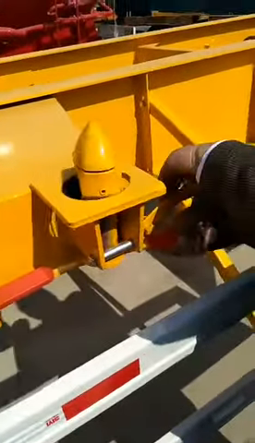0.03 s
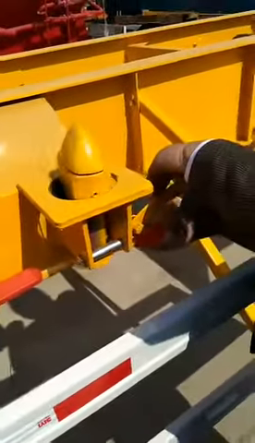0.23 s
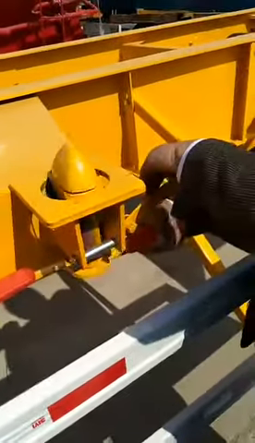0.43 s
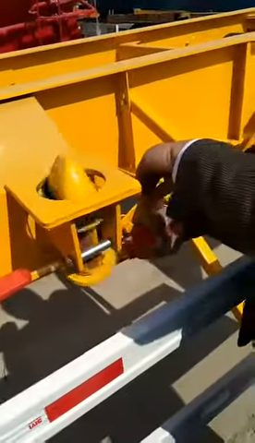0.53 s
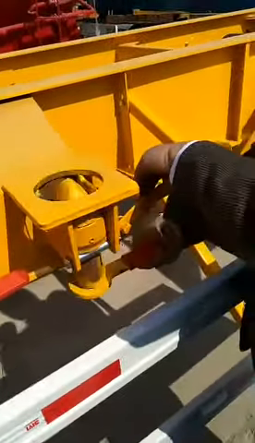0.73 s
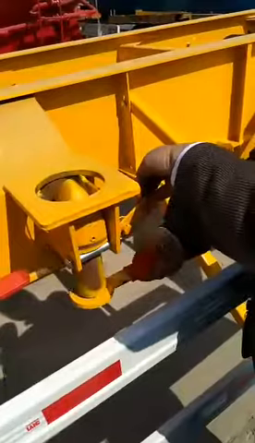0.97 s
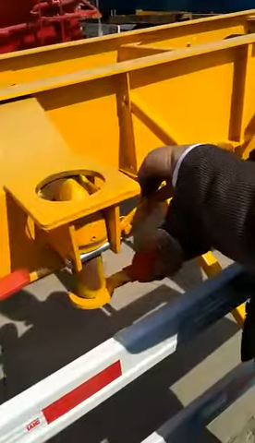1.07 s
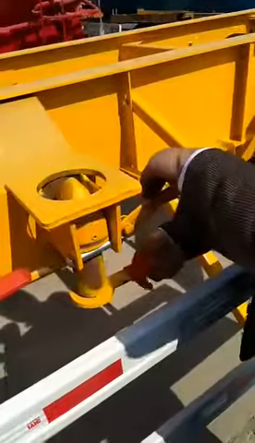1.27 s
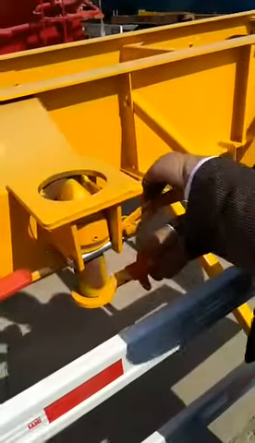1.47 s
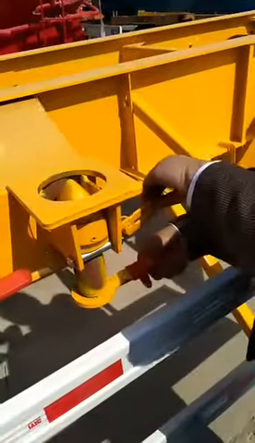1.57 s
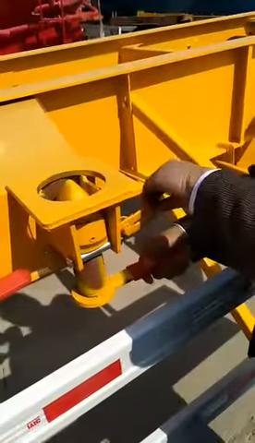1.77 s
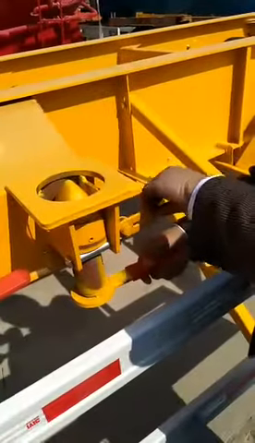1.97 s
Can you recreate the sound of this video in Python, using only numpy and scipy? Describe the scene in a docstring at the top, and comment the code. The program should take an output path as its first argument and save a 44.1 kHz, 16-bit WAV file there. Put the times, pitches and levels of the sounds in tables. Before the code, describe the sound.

Ringing metal clunks and a short scrape as a trailer's lock pin drops into place.

```python
"""Twist lock on a trailer

Outdoors in a yard, one microphone close to a steel twist lock worked by hand. The pin knocks,
scrapes down its sleeve, drops into the bracket and bounces; the handle is set down last. Each blow
runs through the steel frame, treble first and bass after, and leaves it ringing over a low rumble."""
import sys
import numpy as np
from scipy import signal
from scipy.fft import rfft, irfft
from scipy.io import wavfile
from scipy.ndimage import uniform_filter1d

SR = 44100
rng = np.random.default_rng(int(sys.argv[2]) if len(sys.argv) > 2 else 0)


def master(y):
    """Save y as 16-bit WAV."""
    cut = np.clip(np.atleast_2d(y).T, -1, 1)
    pcm = np.round(cut * 32767)  # scale
    wavfile.write(sys.argv[1], SR, pcm.astype(np.int16))


N = 88200

# rumble of the yard: frequency_hz, octave_level_db
YARD_COLOUR = [(20, -81), (40, -70), (70, -56), (110, -50), (200, -54), (350, -54), (600, -66), (1200, -67),
               (1600, -73), (2100, -91), (4000, -99), (8000, -98), (15000, -97)]
# handle rubbing as it turns: time_s, level_db
RUB_LEVELS = [(1.452, -69), (1.55, -57), (1.658, -60), (1.75, -56), (1.92, -56), (2.0, -65)]
# its friction noise: frequency_hz, octave_level_db
RUB_COLOUR = [(100, -8), (350, 1), (600, -4), (1000, 0), (1400, -7), (1900, -34), (4000, -55), (15000, -65)]
# pin scraping down the sleeve: time_s, grind_db, singing_db
SLIDE_LEVELS = [(0.331, -48, -87), (.365, -34.5, -72), (0.409, -30, -67.5), (.45, -41.5, -63.5),
                (.50, -34.5, -63.5), (.56, -40.5, -62), (.61, -42, -59)]
# its grinding: frequency_hz, octave_level_db
GRIND_COLOUR = [(50, -13.5), (120, 6), (220, -1.5), (380, 7), (700, -11), (1200, -21), (1900, -25.5),
                (2450, -24), (3000, -33), (3750, -36.5), (4500, -62), (9000, -57), (15000, -62)]
# grit in the sleeve: start_s, level_db
GRIT_TICKS = [(.449, -71), (.474, -64.5), (.498, -66.5), (.520, -71.5), (.598, -68)]
# one tick of grit: frequency_hz, octave_level_db
GRIT_COLOUR = [(2000, -13), (5500, -7.5), (9000, 3), (11000, -3.5), (13000, -22.5)]

# sleeve around the pin: pitch_hz, level_db, t60_s
SLEEVE_MODES = [(1160, -9, .06), (1170, -7, 0.084), (2310, -5.5, 0.1), (2357, -2.5, 0.11),
                (2440, -4, 0.095), (2740, -10, 0.078), (3220, -19.5, 0.11), (3830, -16, .1)]
# cone on top of the pin: pitch_hz, level_db, t60_s
CONE_MODES = [(952, -0.5, .16), (1030, 5.5, 0.064), (1020, -7, 0.48), (1100, -10, 0.35), (1377, -9.5, 0.28),
              (1540, -11.5, 0.32), (2395, -17, 0.1), (7670, -46, 0.22)]
# high ring of the pin: pitch_hz, level_db, t60_s
PIN_MODES = [(7660, -53, .15), (7750, -49, .15), (9340, -60, .08), (11750, -57, .08), (13000, -60, .16),
             (13260, -62, .16)]
# handle: pitch_hz, level_db, t60_s
HANDLE_MODES = [(700, -1, .15), (775, -9, .25), (1071, -11, .25), (1330, -13, .25), (1459, -7, .24),
                (1830, -13, .26), (2330, -20, .13), (3230, -18, .14), (3560, -24, .13), (4630, -35, .1),
                (4720, -36, .1), (6760, -48, .13), (6930, -45, .13)]
# bracket: pitch_hz, level_db, t60_s
BRACKET_MODES = [(1510, -16.5, 0.38), (1484, -32.5, 0.2), (1770, -27, 1), (2040, -29.5, .33),
                 (2170, -25, .25), (2733, -27, 0.49), (3120, -29, 0.24), (3180, -29, 0.28),
                 (3417, -19.5, 0.16), (3840, -26.5, 0.13), (4590, -44.5, .28)]
# strongest modes of the frame: pitch_hz, level_db, t60_s
FRAME_MODES = [(98.8, -17, 1.95), (117, -26, 9), (157, -17.5, 1.8), (211.4, -16, 1.0), (314.5, -17.5, 1.3),
               (340, -18, 1.8), (378, -9, 1.19), (439.3, -12, 0.85), (503.6, -15, 1.4), (566, -27.5, 0.74),
               (678, -19, 1.3), (711, -4.5, 0.48), (835, -20, .7), (882.8, -13.5, 1.21), (911, -20, 0.84),
               (1115, -29, 0.45), (1190, -23, 1.2), (1290, -27, 0.62), (1320, -25, 0.41), (1455, -19, .7),
               (2385, -34, .72), (2400, -35, .7), (2536, -34, .72), (2620, -36, 0.6), (2980, -36.5, 0.57),
               (3030, -38, .6)]
# dense ringing of the frame: frequency_hz, octave_level_db
FRAME_COLOUR = [(30, -39), (60, -21), (100, -8.5), (190, -1), (260, -3.5), (370, 6), (520, 0), (700, 4),
                (1000, -0.5), (1400, -4), (1900, -10), (2400, -9.5), (3000, -15), (3700, -16), (4400, -28),
                (5800, -39.5), (7500, -36.5), (9000, -44.5), (13000, -33), (15500, -50.5)]
# quick decay while a blow spreads into the frame: frequency_hz, t60_s
SPREAD_T60 = [(100, 0.084), (500, 0.27), (1500, 0.18), (4000, 0.082), (12000, 0.046)]
# long decay of the undamped frame: frequency_hz, t60_s
FRAME_T60 = [(80, 2.6), (200, 1.52), (400, 1.29), (650, 0.89), (1000, 0.92), (1500, 0.87), (2100, 0.62),
             (2600, .58), (3700, .5), (6000, 0.41), (14000, .3)]

# pin clacking on the bracket: start_s, level_db, body_db, t60_s, pin_db, sleeve_db, crack_db
CLACKS = [(0.837, -25, -3.5, .05, -4.5, -12.5, -8.5), (0.8432, -20.5, -1, .055, 7, -4.5, 5),
          (0.8531, -34, 8, 0.087, 23, -12.5, -16)]
# dense part of a clack: frequency_hz, octave_level_db
CLACK_COLOUR = [(60, -29), (200, -6), (380, 4), (700, -8.5), (1250, 2.5), (1750, -23.5), (2400, -9),
                (3000, -7), (3700, -16), (4600, -28), (6500, -35.5), (9000, -45.5), (15000, -51.5)]
# snap of steel on steel: frequency_hz, octave_level_db
CRACK_COLOUR = [(300, -36.5), (1200, 9.5), (2400, 0), (3800, -4.5), (5500, -22), (7500, -34.5),
                (10000, -38.5), (15000, -50)]
# a blow's boom, body, neutral middle, clang and tick: centre_hz
BLOW_BANDS = [130, 380, 950, 2600, 6500]
# blows on the frame: start_s, level_db, boom_db, body_db, clang_db, tick_db, long_ring_db,
# treble_t60_ratio, frame_modes_db, bracket_db, pin_db, handle_db
BLOWS = [ (0.117, -65, 11, 19, -9, -9, -15.5, 0.51, -1.5, -13, -30, -29),
         (0.1923, -29, -20.5, -13, -4.5, -29, -7, 0.44, -7, -14.5, -1, -24.5),
         (0.378, -37, 12.5, 7.5, 0.5, -13, -6, 0.85, 5.5, -4, -16.5, -24),
         (0.61, -18, 5, -1, -2, -1.5, -8.5, 1, -2, -1.5, -14, -8.5),
         (0.657, -28.5, 4, 4.5, -6.5, -7.5, -11, 0.78, -3, -9, -19, -3.5),
         (0.8868, -20, 3, 0.5, 4, 4, -9, 0.62, 4, 6.5, 9, -7),
         (0.9986, -22.5, 6, -1.5, -3, -8, -7.5, 1, 3.5, -7, 3, -19),
         (1.716, -31, -4, -2.5, 0, -13, -9.5, 0.53, -4, -10.5, -40, 1),
         (1.857, -55.5, 20.5, 14.5, -18, -20, -11.5, .5, 11, -18, -28, -13)]

TIME_S, BIN_HZ = np.arange(N) / SR, np.fft.rfftfreq(N, 1 / SR)


def amp(db):
    """Decibels to gain."""
    return 10 ** (np.asarray(db) / 20)


def read(points, hz):
    """Reads a table on a log-frequency axis."""
    table_hz, values = np.transpose(points)
    return np.interp(np.log(hz + 1), np.log(table_hz), values)


def add(mix, start_s, sound):
    """Mixes a sound in at a time."""
    part = mix[round(start_s * SR):][:len(sound)]
    part += sound[:len(part)]


def coloured(white, colour):
    """Spectrum of a white signal shaped to levels per octave."""
    return rfft(white) * amp(read(colour, BIN_HZ)) * np.sqrt(SR / 2 / np.log(2) / (BIN_HZ + 10))


def fade(t, t60):
    """Free decay of a vibration."""
    return np.exp(-np.log(1000) * t / t60)


def scaled_t60(t60, hz, treble_ratio, corner_hz=1980):
    """Ring time with the treble scaled by a ratio; below 1, a hand on the lock damps it."""
    return t60 * treble_ratio ** (hz ** 2 / (hz ** 2 + corner_hz ** 2))


def build_up(t, hz, travel_at_1khz_s=0.0035):
    """Low bending waves travel more slowly, so the treble reaches the microphone first."""
    travel_s = travel_at_1khz_s * (1000 / hz) ** 0.92
    return 1 - np.exp(-(t / travel_s) ** 2)


def ring(modes, treble_ratio=1):
    """Separate modes set off by one blow; neighbours swing in opposite directions."""
    out = np.zeros(N)
    for k, (hz, db, t60) in enumerate(modes):
        t = TIME_S[:int(2 * t60 * SR)]
        envelope = fade(t, scaled_t60(t60, hz, treble_ratio)) * build_up(t, hz)
        add(out, 0, (-1) ** k * amp(db) * envelope * np.sin(2 * np.pi * hz * t))
    return out


def dense_ring(colour, envelope, bands=28):
    """Countless close modes: bands of random vibration, each under its own envelope."""
    centres_hz = np.geomspace(50, 15000, bands)
    band_index = np.interp(np.log(BIN_HZ + 1), np.log(centres_hz), np.arange(bands))
    spectrum = coloured(rng.choice([-1., 1.], N), colour)
    out = np.zeros(N)
    for k, hz in enumerate(centres_hz):
        band = irfft(spectrum * np.maximum(1 - abs(band_index - k), 0), N)
        out += band * build_up(TIME_S, hz) * envelope(TIME_S, hz)
    return out


def yard_rumble():
    """Steady low noise of the open air around the trailer."""
    return irfft(coloured(rng.standard_normal(N), YARD_COLOUR), N)


def handle_rub(squeak_start_s=1.656, squeak_length_s=0.043, squeak_hz=3650, squeak_db=-83.5):
    """Soft friction of the turning handle, with one tiny squeak."""
    times, db = np.transpose(RUB_LEVELS)
    friction = irfft(coloured(rng.standard_normal(N), RUB_COLOUR), N)
    friction *= amp(np.interp(TIME_S, times, db, left=-np.inf))
    t = np.arange(0, squeak_length_s, 1 / SR)
    squeak = np.hanning(len(t)) * np.sin(2 * np.pi * squeak_hz * t)
    add(friction, squeak_start_s, amp(squeak_db) * squeak)
    return friction


def crack(colour, t60):
    """The brief snap of a hard contact, on steel or grit."""
    burst = rng.choice([-1., 1.], N) * fade(TIME_S, t60)
    burst = np.roll(burst, 24)  # room for the colouring to spread ahead of the attack
    return irfft(coloured(burst, colour), N) * (TIME_S < 0.1)


def pin_slide(slips_per_s=610, spread_db=3.5, low_t60=0.14, high_t60=0.02, split_hz=5000):
    """Tiny slips of the falling pin, each stirring the frame and ringing the sleeve."""
    times, grind_db, singing_db = np.transpose(SLIDE_LEVELS)
    slips = (rng.random(N) < slips_per_s / SR) * rng.choice([-1., 1.], N)
    slips *= amp(spread_db * np.minimum(rng.exponential(1, N), 4))
    slips = slips / slips.std() * (TIME_S > times[0]) * (TIME_S < times[-1])

    def envelope(t, hz):
        decay = fade(t, low_t60 if hz < split_hz else high_t60)
        return decay / np.linalg.norm(decay)
    frame = dense_ring(GRIND_COLOUR, envelope)
    sleeve = ring(SLEEVE_MODES, treble_ratio=2.3)
    sleeve /= np.linalg.norm(sleeve)
    grind = signal.fftconvolve(slips * amp(np.interp(TIME_S, times, grind_db)), frame)
    singing = signal.fftconvolve(slips * amp(np.interp(TIME_S, times, singing_db)), sleeve)
    return (grind + singing)[:N]


def pin_clack(level_db, body_db, t60, pin_db, sleeve_db, crack_db, body_t60=0.17, body_top_hz=550):
    """A hard, short hit on the bracket that rings pin and sleeve and barely stirs the frame."""
    def envelope(t, hz):
        return amp(body_db) * fade(t, body_t60) if hz < body_top_hz else fade(t, t60)
    knock = dense_ring(CLACK_COLOUR, envelope)
    rings = amp(pin_db) * ring(PIN_MODES) + amp(sleeve_db) * ring(SLEEVE_MODES)
    snap = amp(crack_db) * crack(CRACK_COLOUR, t60=0.006)
    return amp(level_db) * (knock + rings + snap)


def mode_clusters(depth_db=2.8, ring_s=0.008, lower_edge_hz=1000):
    """Close modes bunch at random: peaks and valleys in the frame's response, the same for every blow."""
    paths = rng.standard_normal(N) * TIME_S * np.exp(-2 * TIME_S / ring_s)
    ripple = rfft(paths / np.linalg.norm(paths)) * np.sqrt(2)
    treble_share = BIN_HZ / np.hypot(BIN_HZ, lower_edge_hz)
    gain = np.exp(ripple * np.log(amp(depth_db)) * treble_share)
    local_power = uniform_filter1d(abs(gain) ** 2, size=1200)
    return gain / np.sqrt(local_power)


def frame_blow(clusters, level_db, boom_db, body_db, clang_db, tick_db, long_ring_db,
               treble_ratio, frame_modes_db, bracket_db, pin_db, handle_db):
    """A clunk that spreads quickly into the frame and rings on there and in the parts of the lock."""
    tone = list(zip(BLOW_BANDS, [boom_db, body_db, 0, clang_db, tick_db]))

    def envelope(t, hz):
        spread = fade(t, read(SPREAD_T60, hz))
        long_ring = amp(long_ring_db) * fade(t, scaled_t60(read(FRAME_T60, hz), hz, treble_ratio))
        return amp(read(tone, hz)) * np.hypot(spread, long_ring)
    frame = irfft(rfft(dense_ring(FRAME_COLOUR, envelope)) * clusters, N)
    frame += amp(frame_modes_db) * ring(FRAME_MODES, treble_ratio)
    bracket = amp(bracket_db) * ring(BRACKET_MODES, treble_ratio)
    pin = amp(pin_db) * ring(PIN_MODES)
    handle = amp(handle_db) * ring(HANDLE_MODES)
    return amp(level_db) * (frame + bracket + pin + handle)


def scene():
    """All contacts of the lock over the rumble of the yard, in mono."""
    mix = yard_rumble() + pin_slide() + handle_rub()
    clusters = mode_clusters()
    add(mix, 0.1927, amp(-27.5) * ring(CONE_MODES))  # the cone knocks once against the plate
    for start_s, *blow in BLOWS:
        add(mix, start_s, frame_blow(clusters, *blow))
    for start_s, *clack in CLACKS:
        add(mix, start_s, pin_clack(*clack))
    for start_s, level_db in GRIT_TICKS:
        add(mix, start_s, amp(level_db) * crack(GRIT_COLOUR, t60=0.008))
    return mix[None]


def record(dry):
    """The recorder behind the microphone cuts off at 15.5 kHz."""
    low_pass = signal.firwin(511, 15500, window=("kaiser", 9), fs=SR)
    return signal.oaconvolve(dry, low_pass[None], "same")


dry = scene()
out = record(dry)
master(out)
```